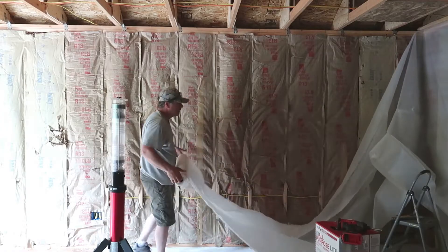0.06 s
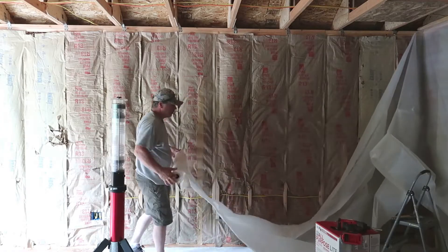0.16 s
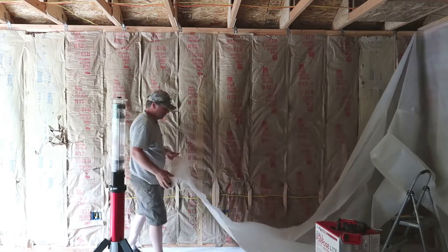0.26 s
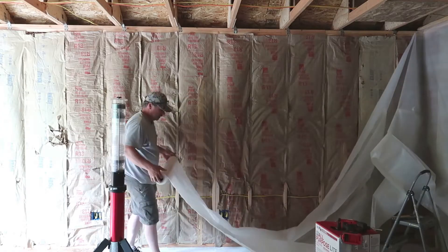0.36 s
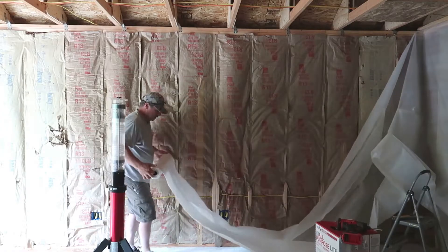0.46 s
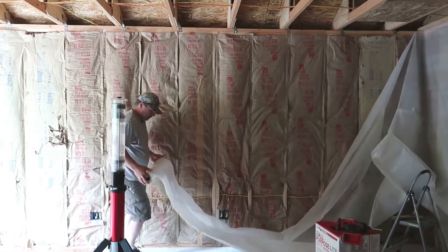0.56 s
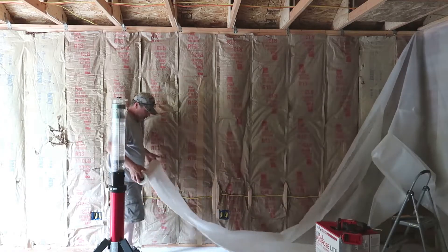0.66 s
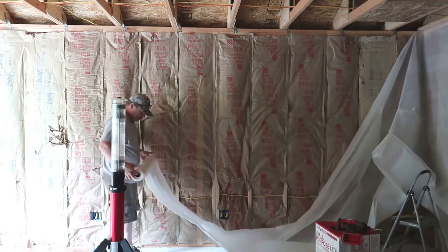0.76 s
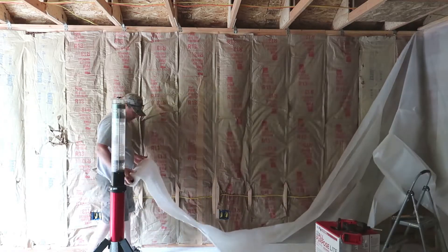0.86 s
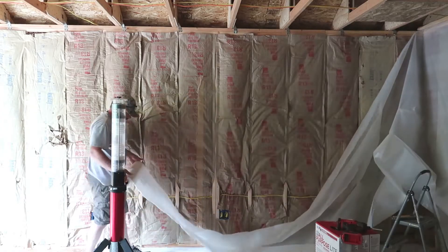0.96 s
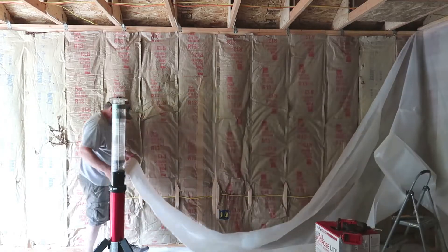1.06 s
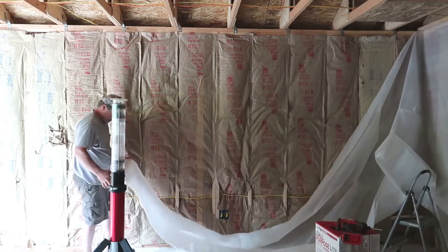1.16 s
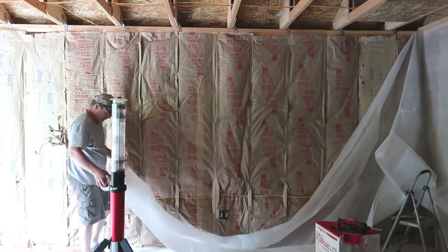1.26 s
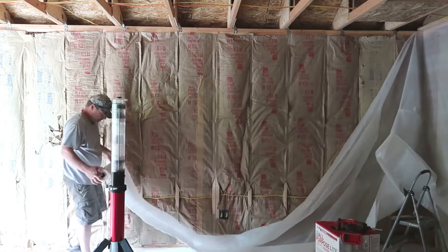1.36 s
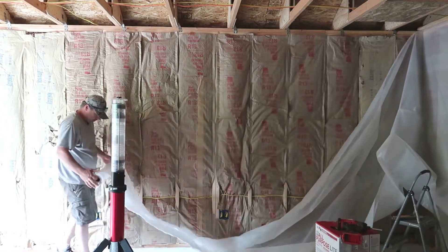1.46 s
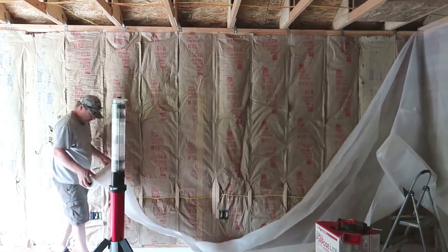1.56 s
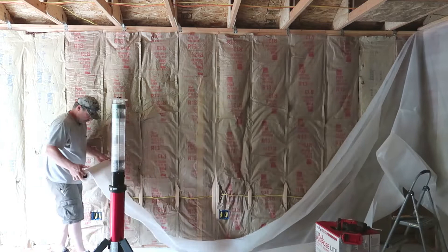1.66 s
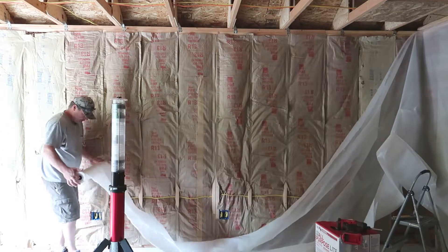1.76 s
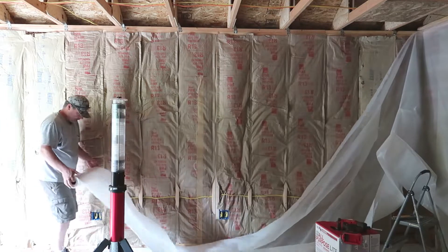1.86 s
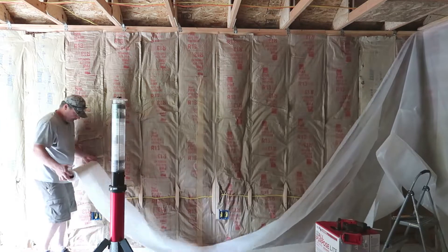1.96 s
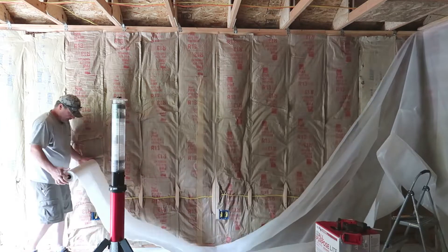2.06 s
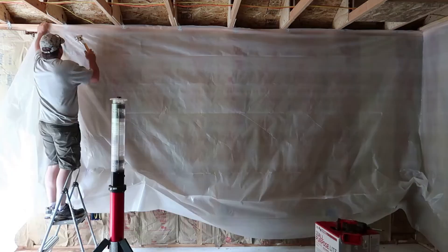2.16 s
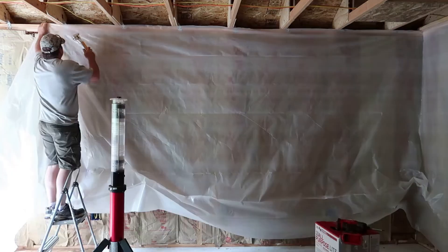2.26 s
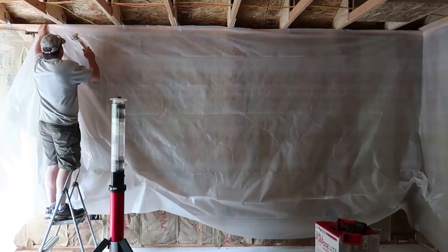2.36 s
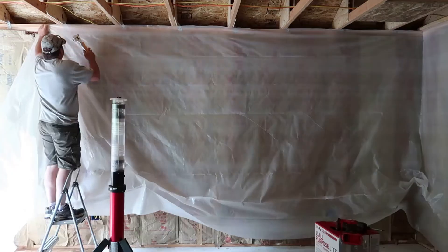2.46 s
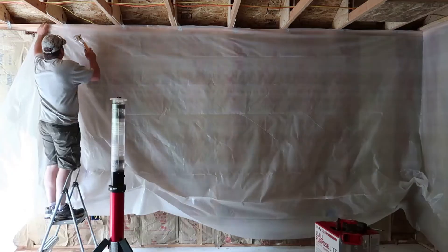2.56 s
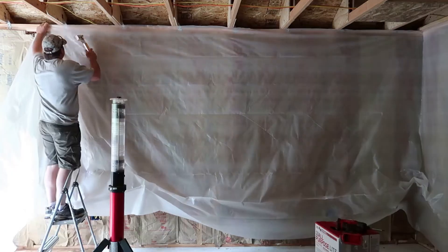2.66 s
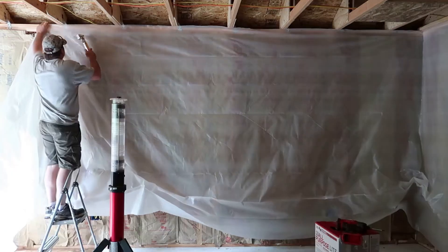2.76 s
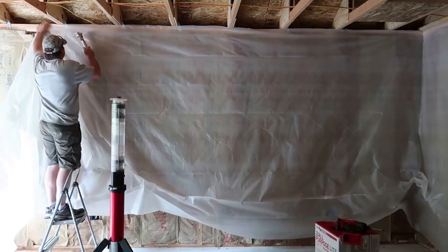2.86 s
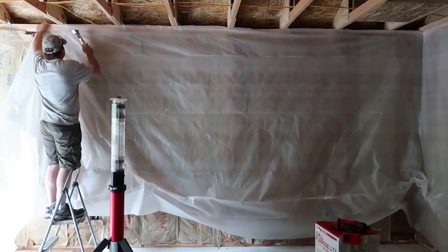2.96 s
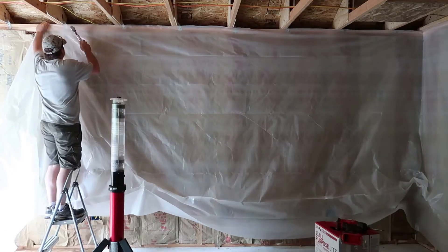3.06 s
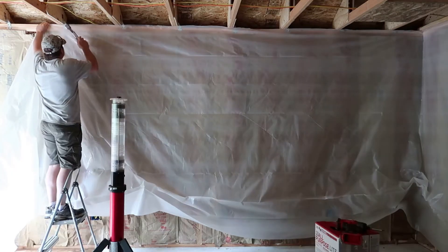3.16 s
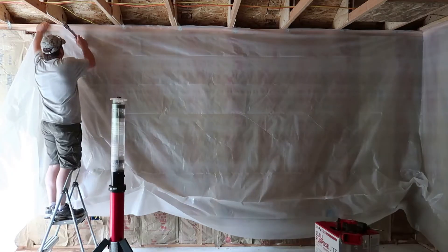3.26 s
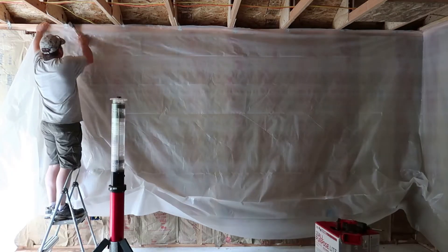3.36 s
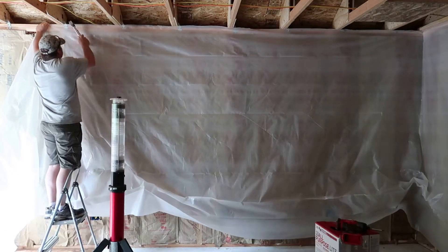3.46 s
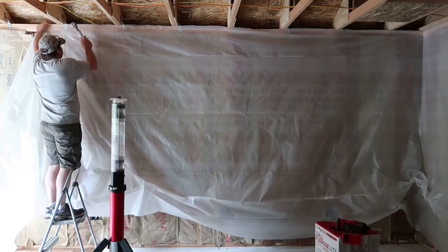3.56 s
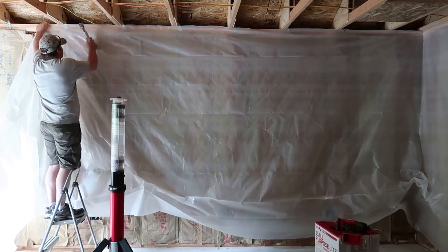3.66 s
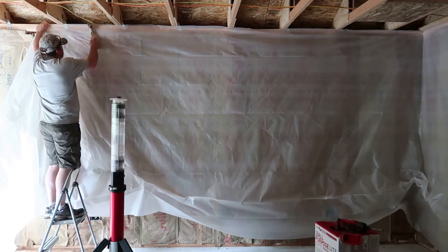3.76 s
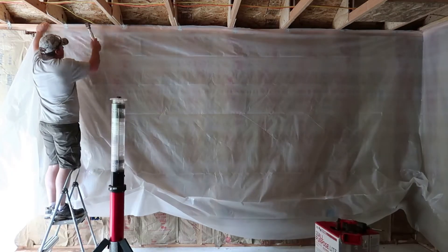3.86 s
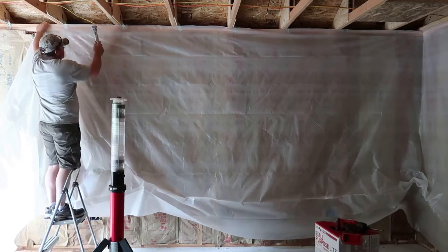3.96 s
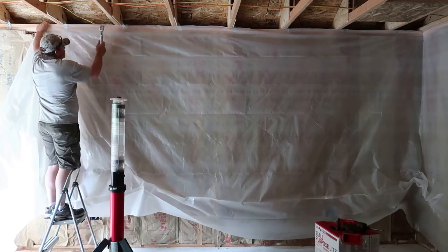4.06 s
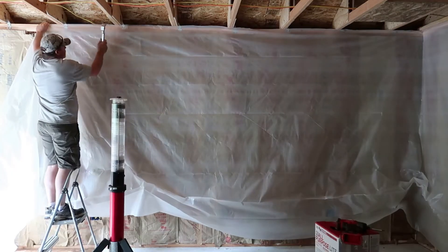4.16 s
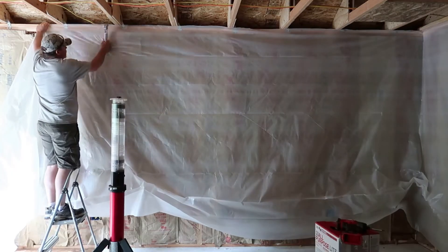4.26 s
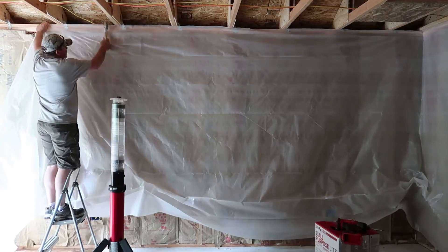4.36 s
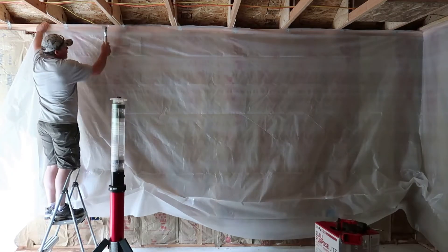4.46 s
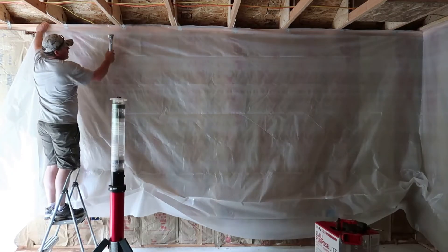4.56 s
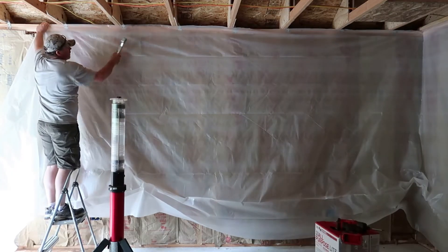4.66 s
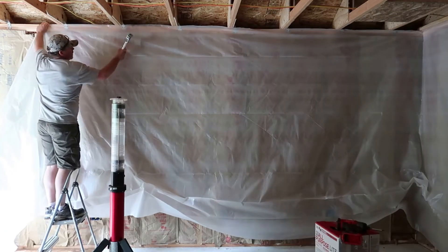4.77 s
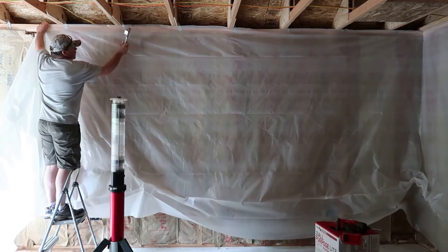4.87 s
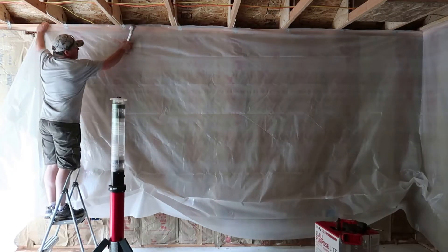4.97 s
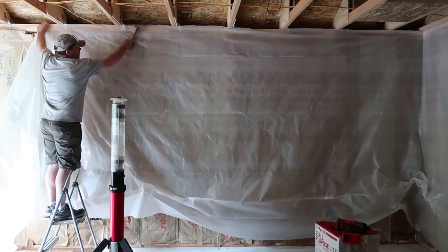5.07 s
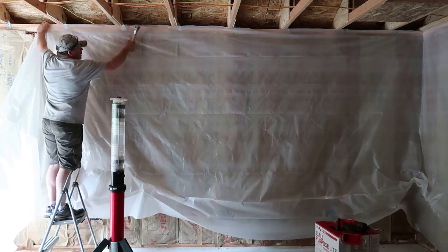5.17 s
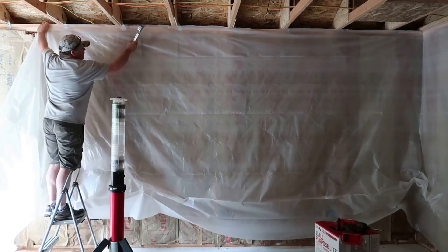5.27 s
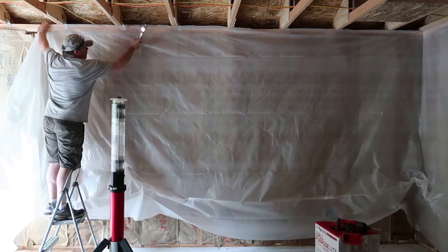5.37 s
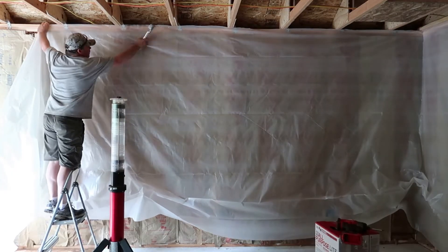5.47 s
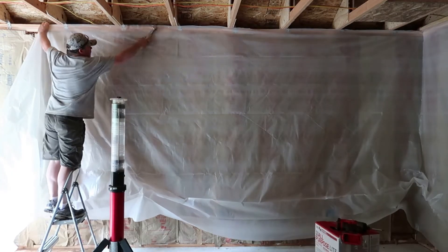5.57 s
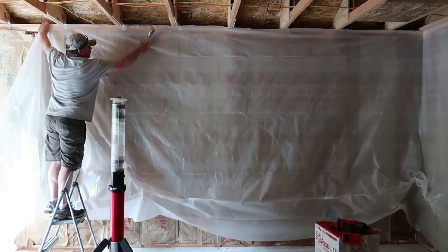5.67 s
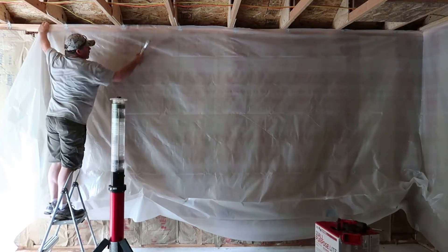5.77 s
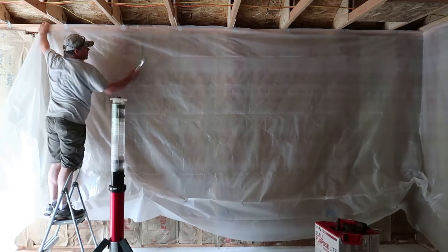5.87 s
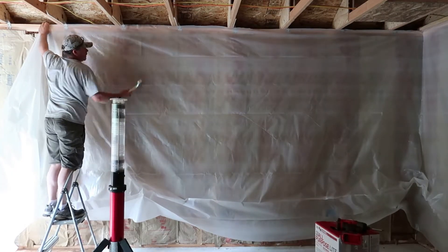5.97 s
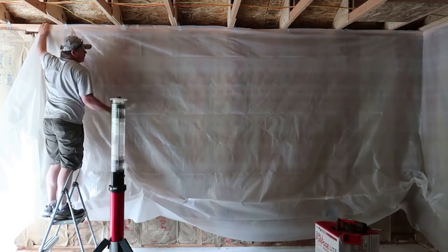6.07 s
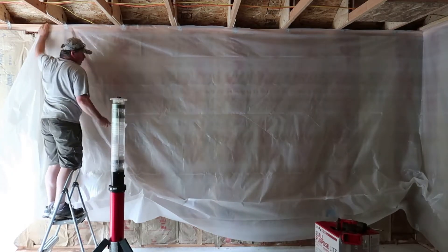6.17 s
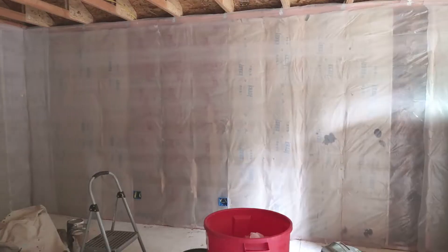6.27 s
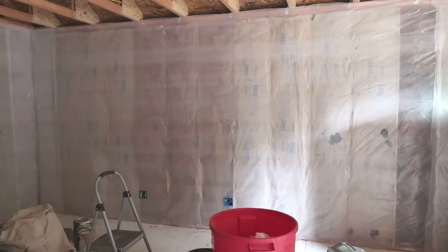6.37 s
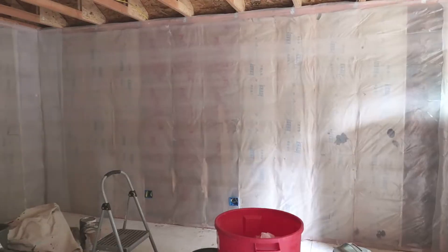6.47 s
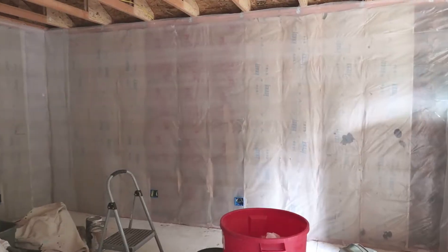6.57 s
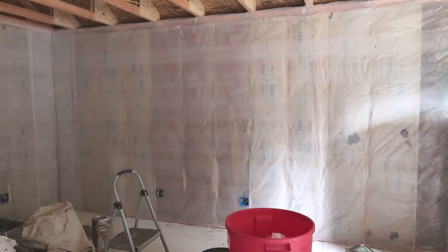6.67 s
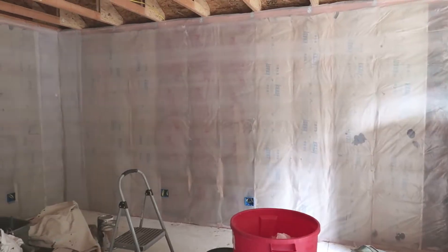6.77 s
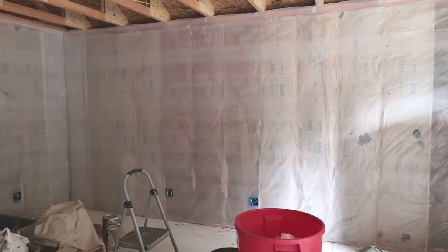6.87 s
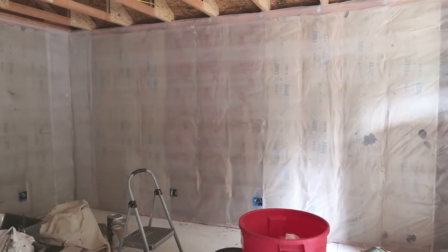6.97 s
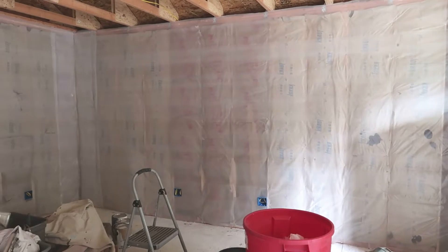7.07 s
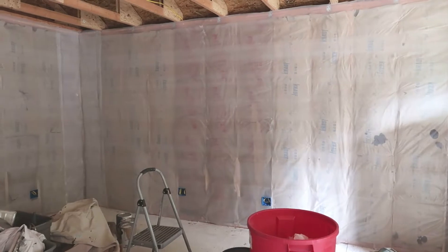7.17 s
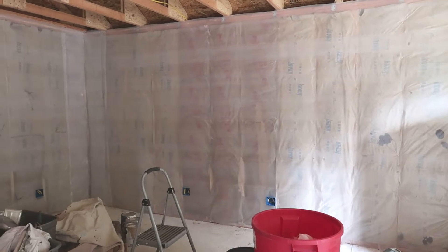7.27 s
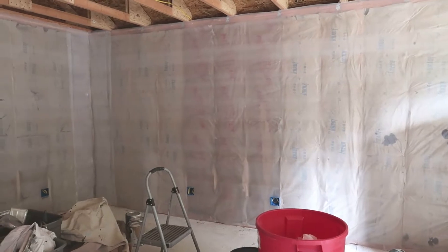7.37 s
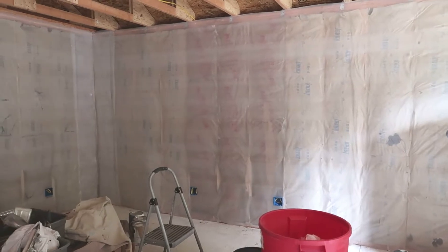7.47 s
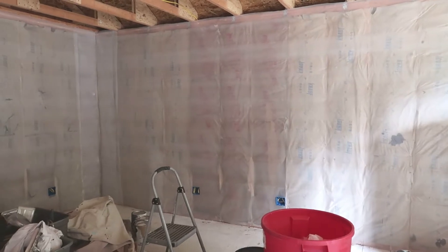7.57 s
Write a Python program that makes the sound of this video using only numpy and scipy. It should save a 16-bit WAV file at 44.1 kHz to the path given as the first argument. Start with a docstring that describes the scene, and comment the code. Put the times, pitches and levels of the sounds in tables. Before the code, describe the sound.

Rustling plastic film swells and ebbs quickly as someone walks it along a wall, folds popping and boards thumping dully. Then gentler strokes and rubbery squeaks on the hanging sheet, a near-silent pause, and five irregular loud staple-hammer whacks into wood, with short indoor reverberation. Between blows only tiny crinkles remain. At the end the work stops abruptly and soft, steady ventilation noise remains. Heard from across a small hard room, mostly centred.

```python
"""An unfinished room: thin plastic sheeting is dragged along the wall, swishing with every step.
Buckling creases, flipping folds and booming footfalls are noises and tones with decaying envelopes.
At 2.11 s smoothing strokes and squeaks take over; five blows of a hammer stapler follow: filtered noise
for the steel clack, decaying modes for the thud of the timber, and noise fading as the room does.
At 6.21 s the still air gives way to a fan's faint rush and wavering hum."""
import sys
import numpy as np
from scipy import signal
from scipy.fft import rfft, irfft, next_fast_len
from scipy.io import wavfile
from scipy.ndimage import uniform_filter1d

SR = 44100
rng = np.random.default_rng(int(sys.argv[2]) if len(sys.argv) > 2 else 0)


def to_wav(sig):
    """Store sig (one row per channel, or 1-D mono) as 16-bit WAV at the path in sys.argv[1].

    Samples outside -1..1 are clipped; the rate is SR.
    """
    pcm = np.clip(np.atleast_2d(sig), -1, 1) * 32767
    pcm = np.round(pcm).astype(np.int16)
    wavfile.write(sys.argv[1], SR, pcm.T)  # frames by channels


N = 336042
TIME = np.arange(N) / SR
PULL_END_S, WORK_END_S = 2.113, 6.21

# stapler blows: t/s, swell time constant before the blow/s, clack level/dB, thud level/dB, boom level/dB,
# room level/dB, main note of that spot on the beam f/Hz, second note f/Hz, note level/dB
STAPLER_BLOWS = [(3.419, 0.007, -9.5, -10.5, -15, -20, 690, 844, -11.5),
                 (3.8085, 0.0046, -20, -14.5, -17.5, -23, 705, 541.5, -15),
                 (4.3847, 0.0099, -19.5, -14, -17.5, -23.5, 552, 999, -18.5),
                 (5.0953, 0.0082, -16.5, -26, -15, -20, 954, 224, -25),
                 (5.5888, 0.0083, -17, -19, -18, -19.5, 624, 280, -20)]
# stereo width of most sounds: f/Hz, side minus mid level/dB
STEREO_WIDTH = [(140, -41), (300, -27.5), (640, -23.5), (1300, -16.5), (2500, -12.5), (4400, -3.5),
                (6600, -3), (9400, -7), (13000, -9.5)]
# stereo width of the smoothed film and the still air: f/Hz, side minus mid level/dB
SOFT_STEREO_WIDTH = [(55, -24.5), (300, -4.5), (1300, -12), (2500, -10.5), (4400, -4.5), (7000, -4),
                     (9000, -17.5)]


def amp(db):
    """Level definition: decibels to amplitude ratio."""
    return 10 ** (np.asarray(db) / 20)


def rms_one(x):
    """Normalisation of effective value: unit rms, a stereo pair by its middle."""
    middle = np.atleast_2d(x).mean(axis=0)
    return x / np.sqrt(np.mean(middle ** 2) + 1e-20)


def at_hz(points, hz):
    """Logarithmic pitch scale: interpolate a table along log frequency."""
    f, value = np.transpose(points)
    return np.interp(np.log(hz + 1), np.log(f), value)


def until(end_s, fade_s):
    """Linear gating: one at first, falling to zero over the fade before the end."""
    return np.clip((end_s - TIME) / fade_s, 0, 1)


def add(out, s, sound):
    """Superposition: mix a short sound in at a moment."""
    i = max(round(s * SR), 0)
    out[:, i:i + sound.shape[-1]] += sound[..., :N - i]


def butter(x, hz, kind):
    """Maximally flat filtering: a Butterworth design of order two."""
    return signal.sosfilt(signal.butter(2, hz, kind, fs=SR, output="sos"), x)


def white(size):
    """Statistical independence: two unrelated white noises."""
    return rng.standard_normal((2, size))


def drift(rate):
    """Random modulation: normally distributed knots, rate per second, joined by straight lines."""
    knots = rng.standard_normal(4000)
    return np.interp(TIME * rate, np.arange(len(knots)), knots)


def colour(pair, spectrum, tilt_db=0, width=STEREO_WIDTH):
    """Spectral shaping: filter two excitations as middle and side, tilted in dB per octave; rms 1."""
    size = pair.shape[1]
    padded = next_fast_len(size)
    hz = np.fft.rfftfreq(padded, 1 / SR) + 1
    # extra roll-off below the lowest table frequency
    skirt = 1 / np.sqrt(1 + (spectrum[0][0] / hz) ** 6)
    gain = skirt * amp(at_hz(spectrum, hz) + tilt_db * np.log2(hz))
    mid, side = rfft(pair, padded) * gain
    side = side * amp(at_hz(width, hz))
    left_right = irfft([mid + side, mid - side], padded)
    return rms_one(left_right[:, :size])


def die_away(noise):
    """Frequency-dependent reverberation: each band decays exponentially with its own t60."""
    # reverberation of the room: f/Hz, t60/s
    room_decay = [(100, 0.31), (300, .3), (900, 0.24), (2500, 0.35), (7000, 0.41), (15000, 0.38)]
    size = noise.shape[1]
    t = np.arange(size) / SR
    hz = np.fft.rfftfreq(size, 1 / SR)
    bins = rfft(noise)
    faded = np.zeros(noise.shape)
    centres, t60s = np.transpose(room_decay)
    for own, t60 in zip(np.eye(len(centres)), t60s):
        share = at_hz(np.c_[centres, own], hz)   # overlapping bands that add up to one
        faded += irfft(bins * share, size) * amp(-60 * t / t60)
    return faded


def background():
    """Stationary noise and tones: still air during the work, then a fan's rush and phase-wavering hum."""
    # still air: f/Hz, spectral level/dB per Hz before scaling
    still_air = [(25, -6), (80, -6), (200, -16), (700, -27.5), (3800, -34), (14000, -47.5)]
    # rush of the fan: f/Hz, spectral level/dB per Hz before scaling
    fan_rush = [(15, -41), (25, -13), (49, -1.5), (71, -3.5), (101, -3), (344, -6.5), (558, -12),
                (6540, -28.5), (15000, -39)]
    # stereo width of the rush: f/Hz, side minus mid level/dB
    rush_width = [(55, -13), (300, 2), (4700, 0.5), (7000, -12), (9000, -25)]
    # hum of the fan: f/Hz, rms level/dB
    hum_tones = [(48.4, -71.5), (101.5, -68), (150.5, -73)]
    air_db, rush_db = -71, -61.5
    working = until(WORK_END_S, 0.017)
    hum = np.zeros(N)
    for hz, level_db in hum_tones:
        phase = 2 * np.pi * hz * TIME + 0.45 * drift(4.2)
        hum += amp(level_db) * np.sqrt(2) * np.sin(phase)
    fan = amp(rush_db) * colour(white(N), fan_rush, width=rush_width) + hum
    air = amp(air_db) * colour(white(N), still_air, width=SOFT_STEREO_WIDTH)
    return working * air + (1 - working) * fan


def movement(strokes, rest_db, hold_s=0.0077):
    """Addition of powers: each movement gathers speed, holds it briefly and dies away; level in dB."""
    power = amp(rest_db) ** 2
    for s, level_db, rise_s, release_s in strokes:
        gather = np.exp(-(np.minimum(TIME - s, 0) / rise_s) ** 2 / 2)
        release = np.exp(-np.maximum(TIME - s - hold_s, 0) / release_s)
        power = power + (amp(level_db) * gather * release) ** 2
    return 10 * np.log10(power)


def follow(level_db, law):
    """Compressed dynamics: a band takes only a share of the swing of the swish."""
    offset_db, share = law   # offset in dB at the fastest, share of the swing
    return level_db.max() + offset_db + share * (level_db - level_db.max())


def crease_crackle(level_db, creases_per_s, size_db):
    """Random impulse process: creases buckle more often in faster motion, and the room answers."""
    rate = creases_per_s * amp((level_db - level_db.max()) / 2)
    born = rng.random(N) < rate / SR
    sizes = amp(size_db * np.minimum(rng.exponential(1, N), 4))
    creases = born * sizes * white(N)
    room = die_away(white(SR // 2))
    echoes = signal.fftconvolve(creases, room, axes=1)[:, :N]
    return rms_one(creases) + rms_one(echoes)


def film(level_db, lows_law, treble_law, spectrum, width, creases_per_s, size_db, crackle_db, flutter_db,
         patchy_db):
    """Friction noise and buckling: crackle over a hiss, with resonances of sheet panels that come and go."""
    crackle = crease_crackle(level_db, creases_per_s, size_db)
    sheet = colour(rms_one(white(N)) + amp(crackle_db) * crackle, spectrum, width=width)
    # panels between the folds change shape: smoothed random gains over frequency and time
    hz, _, cells = signal.stft(sheet, SR, nperseg=1024)
    panels = rng.standard_normal(cells.shape[1:])
    for axis in (0, 1):
        panels = uniform_filter1d(panels, size=3, axis=axis)
    panels = rms_one(panels.ravel()).reshape(panels.shape)
    cells = cells * amp(patchy_db * panels)
    # three bands, each with its own dynamics
    low = 1 / (1 + (hz / 1000) ** 4)
    high = 1 - 1 / (1 + (hz / 4500) ** 6)
    bands = [rms_one(signal.istft(cells * share[:, None])[1][:, :N]) for share in (low, 1 - low - high, high)]
    lows, body, treble = bands
    swish = amp(level_db) * body
    swish = swish + amp(follow(level_db, lows_law)) * lows
    swish = swish + amp(follow(level_db, treble_law)) * treble
    return amp(flutter_db * drift(70)) * swish


def dragged_sheet():
    """Sliding friction: steady sliding swells with one tug at the sheet for every stride."""
    # tugs: t/s at the fastest, swish level/dB, rise/s, release/s
    tugs = [(.03, -45, 0.035, 0.049), (.197, -40.5, 0.046, 0.051), (.49, -37.5, 0.067, 0.066),
            (.805, -43, 0.068, 0.19), (1.142, -38.5, 0.049, 0.062), (1.438, -38, 0.022, 0.11),
            (1.787, -41.5, 0.059, 0.056), (2.048, -42.5, .035, 0.11)]
    # colour of the dragged film: f/Hz, spectral level/dB per Hz before scaling
    drag_colour = [(21, -34), (35, -6.5), (113, -4), (158, 0), (249, -9), (290, -6), (384, -7.5), (448, -3),
                   (593, -7.5), (691, -5), (2470, -10), (9310, -24), (12600, -30.5), (15500, -48)]
    # stereo width of the dragged film: f/Hz, side minus mid level/dB
    drag_width = [(55, -33), (300, -11), (640, -20.5), (1300, -20), (2500, -12.5), (6600, -3.5),
                  (13000, -7.5)]
    return film(movement(tugs, rest_db=-50), (-4.5, 0.72), (-13.5, 0.83), drag_colour, drag_width,
                creases_per_s=3000, size_db=2, crackle_db=-6.5, flutter_db=1.1, patchy_db=2.0)


def steps(roll_s=0.012, scuff_db=-9, t60_s=0.17):
    """Damped resonance: a sole rolls softly onto the boards, which boom briefly."""
    # footfalls: t/s, level/dB before the envelope, f/Hz
    footfalls = [(.19, -30, 187.5), (.907, -27, 100), (.92, -32, 186.7), (.962, -28, 89),
                 (1.515, -32.5, 142), (1.565, -32, 107), (1.611, -32.5, 46.3)]
    out = np.zeros((2, N))
    t = np.arange(SR // 2) / SR
    envelope = (1 - np.exp(-t / roll_s)) * amp(-60 * t / t60_s)
    for s, level_db, hz in footfalls:
        scuff = rms_one(butter(white(len(t))[0], [hz / 2, hz * 2], "band"))
        boom = np.sin(2 * np.pi * hz * t) + amp(scuff_db) * scuff
        add(out, s, amp(level_db) * boom * envelope)
    return out


def folds(echo_db=-12, grain_db=3, rise_s=0.0034, t60_s=0.093):
    """Snap-through buckling: a larger fold flips over with a short, grainy, band-limited burst."""
    # flipping folds: t/s, level/dB before the envelope, centre f/Hz
    flips = [(.367, -37, 2730), (.677, -36, 1440), (.697, -35.5, 660), (0.884, -41.5, 5500),
             (1.045, -45.5, 5500), (1.297, -38.5, 1120), (1.941, -39.5, 1170), (2.278, -48.5, 4880),
             (2.422, -46, 3000), (3.25, -57, 6094), (4.147, -68, 4960), (4.755, -64.5, 4520),
             (4.791, -68.5, 900), (5.047, -49.5, 700), (5.48, -62, 2900), (6.01, -63.5, 6000),
             (6.14, -59.5, 1800), (6.171, -61.5, 5000)]
    out = np.zeros((2, N))
    t = np.arange(SR // 2) / SR
    for s, level_db, hz in flips:
        bell = [(hz / 8, -16), (hz / 2, -3), (hz, 0), (hz * 2, -11), (hz * 16, -60)]
        grains = white(len(t)) * amp(grain_db * rng.standard_normal(len(t)))
        burst = colour(grains, bell)
        decaying = burst * amp(-60 * t / t60_s) + amp(echo_db) * die_away(burst)
        add(out, s, amp(level_db) * decaying * (1 - np.exp(-t / rise_s)))
    return out


def smoothed_sheet():
    """Sliding friction: the hand strokes the hanging sheet in separate movements."""
    # strokes of the hand: t/s at the fastest, swish level/dB, rise/s, release/s
    hand_strokes = [(2.14, -57.5, .06, .2), (2.55, -50.5, .24, 0.37), (2.89, -50.5, 0.086, 0.11),
                    (3.275, -61.5, 0.022, .1), (4.8, -73.5, .02, 0.048), (5.86, -71.5, .05, .15),
                    (6.05, -70, 0.024, .3)]
    # colour of the smoothed film: f/Hz, spectral level/dB per Hz before scaling
    smooth_colour = [(71, -25.5), (120, -1), (288, -5.5), (676, -6.5), (748, -8), (975, -7), (2870, -10.5),
                     (10100, -21.5), (13200, -29), (15500, -42)]
    return film(movement(hand_strokes, rest_db=-89.5), (-3.5, 0.82), (-10, 0.92), smooth_colour,
                SOFT_STEREO_WIDTH, creases_per_s=2500, size_db=2.0, crackle_db=-13.5, flutter_db=1.0,
                patchy_db=3.5)


def billow():
    """Low-frequency radiation: the hanging sheet rumbles as band-passed noise."""
    return amp(-60.0) * rms_one(butter(white(N)[0], [55, 170], "band"))


def squeaks(glide=0.006, bandwidth_hz=110):
    """Friction-excited resonance: narrow noise bands rise a little in pitch as the taut film tightens."""
    # squeaks under the palm: t/s at the loudest, half length/s, f/Hz, level/dB at the loudest
    palm_squeaks = [(2.82, 0.03, 1220, -46.5), (2.85, 0.037, 1600, -46.5), (2.92, 0.024, 1630, -45),
                    (2.88, 0.051, 2150, -51.5), (2.855, .022, 2400, -46.5), (5.87, .035, 1480, -69),
                    (6.03, 0.052, 1590, -73.5)]
    out = np.zeros(N)
    for s, half_s, hz, level_db in palm_squeaks:
        stroke = (TIME - s) / half_s
        turn = 2 * np.pi * np.cumsum(hz * (1 + glide * np.tanh(stroke))) / SR
        # slow noises on two carriers in quadrature make one narrow band
        a, b = butter(white(N), bandwidth_hz / 2, "low")
        tone = rms_one(a * np.cos(turn) + b * np.sin(turn))
        out += amp(level_db) * np.exp(-stroke ** 2 / 2) * tone
    return out


def ring(modes, luck_db, detune, rise_s):
    """Modal superposition: struck modes decay, with strengths and pitches slightly random at each blow."""
    t = np.arange(SR) / SR
    luck = rng.standard_normal((len(modes), 2))
    tones = np.zeros(SR)
    for k, ((hz, level_db, t60), (a, b)) in enumerate(zip(modes, luck)):
        decay = amp(level_db + luck_db * a - 60 * t / t60)
        tones += (-1) ** k * decay * np.sin(2 * np.pi * hz * (1 + detune * b) * t)   # alternating sign
    return tones * (1 - np.exp(-t / rise_s))


def stapler(swell_db=-10, drive_s=0.0085, settle_s=0.0042, build_s=0.0075, thud_delay_s=0.002,
            note_t60=0.11, second_note_db=-3.5, uneven_db=1.0, echoes_per_s=250):
    """Impact excitation: a brief noise swell leads into the clack; timber and room ring on."""
    # colour of the steel clack: f/Hz, spectral level/dB per Hz before tilt and scaling
    clack_colour = [(180, -31), (300, -1), (571, -5.5), (696, -1), (1640, -9), (1940, -10.5), (2100, -10.5),
                    (2740, -11.5), (3020, -17), (7140, -23.5), (9290, -22.5), (13600, -28), (15500, -38.5)]
    # colour of its reverberation: f/Hz, spectral level/dB per Hz before tilt and scaling
    tail_colour = [(59, -36), (100, -7), (181, -8), (313, -9), (347, -17.5), (447, -9.5), (589, -9),
                   (668, -7), (742, -13.5), (879, -8.5), (1430, -16), (2870, -17.5), (3930, -23.5),
                   (11500, -26.5), (15500, -46)]
    # modes of the beam and the steel tool: f/Hz, level/dB re thud, t60/s
    timber_modes = [(154, -11, 0.2), (177.4, -12, 0.23), (224, 1.5, 0.077), (262.5, 0.5, .07),
                    (447, -6.5, 0.11), (1152, -15, .09), (1316, -16, .09), (1895, -14.5, 0.11),
                    (2720, -17, 0.057), (3290, -20.5, 0.11), (5130, -21.5, 0.064), (8600, -24, .1),
                    (9423, -23, .08)]
    # low modes of the wall and room: f/Hz, level/dB re boom, t60/s
    boom_modes = [(54, -27, .8), (65.3, -26.5, 0.67), (88.5, -15, 0.45), (138.8, -15.5, .32)]
    clack_tilt_db, room_tilt_db = 1.0, -0.93   # dB per octave
    out = np.zeros((2, N))
    t = np.arange(SR) / SR
    short = t[:SR // 10]
    for s, swell_s, clack_db, thud_db, boom_db, room_db, note_hz, second_hz, note_db in STAPLER_BLOWS:
        # a short noise swells just before each blow
        swell = colour(white(len(short)), clack_colour, clack_tilt_db) * np.exp(-short / swell_s)[::-1]
        add(out, s - short[-1], amp(clack_db + swell_db) * swell)

        # steel parts chatter for as long as the staple is being driven
        chatter = colour(white(len(short)), clack_colour, clack_tilt_db)
        settling = np.exp(-np.maximum(short - drive_s, 0) / settle_s)
        add(out, s, amp(clack_db) * chatter * settling)

        # the notes of this spot have levels of their own, independent of the thud
        note_re_thud_db = note_db - thud_db
        notes = [(note_hz, note_re_thud_db, note_t60), (second_hz, note_re_thud_db + second_note_db, note_t60)]
        thud = ring(timber_modes + notes, luck_db=0.94, detune=0.004, rise_s=0.003)
        add(out, s + thud_delay_s, amp(thud_db) * thud)
        add(out, s, amp(boom_db) * ring(boom_modes, luck_db=0.6, detune=0.0054, rise_s=0.0023))

        # reflections from joists and walls arrive in uneven clumps
        clumps = amp(uneven_db * drift(echoes_per_s)[:SR]) * (1 - np.exp(-t / build_s))
        tail = die_away(colour(white(SR), tail_colour, room_tilt_db))
        add(out, s, amp(room_db) * clumps * tail)
    return out


def scene():
    """Superposition of sources: dragging, smoothing, stapling, then the fan."""
    pulling = until(PULL_END_S, 0.003)
    before_blows = until(STAPLER_BLOWS[0][0], 0.02)
    working = until(WORK_END_S, 0.011)
    dragged = dragged_sheet() * pulling
    hanging = (smoothed_sheet() * working + billow() * before_blows) * (1 - pulling)
    # the work is done a little to the left: gain/dB of left and right
    work = (hanging + squeaks() + stapler()) * amp([[0.2], [-0.2]])
    return background() + dragged + steps() + folds() + work


def record(dry, top=0.48, cutoff_hz=15500):
    """Saturation and band limiting: peaks are rounded, then an elliptic low-pass cuts the top."""
    rounded = top * np.tanh(dry / top)
    return signal.sosfilt(signal.ellip(10, 0.2, 80, cutoff_hz, fs=SR, output="sos"), rounded)


dry = scene()
out = record(dry)
to_wav(out)
```